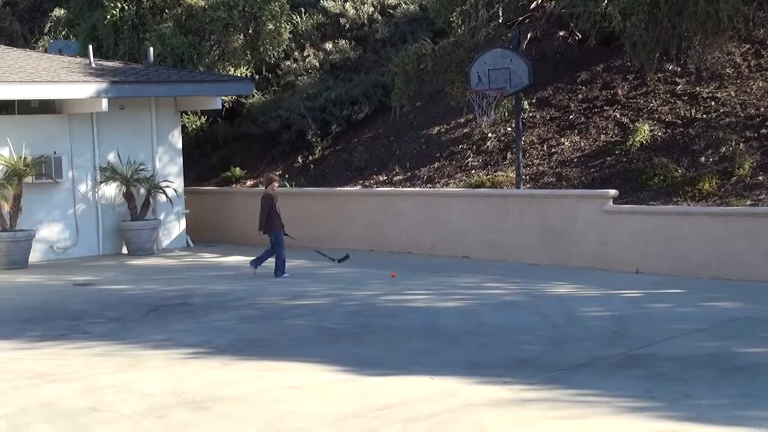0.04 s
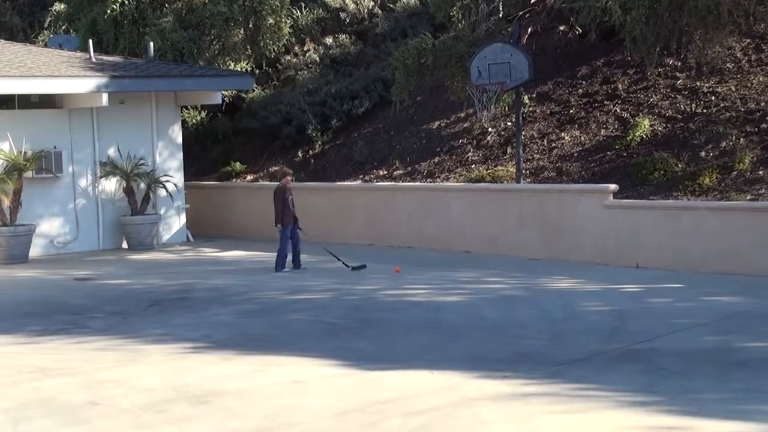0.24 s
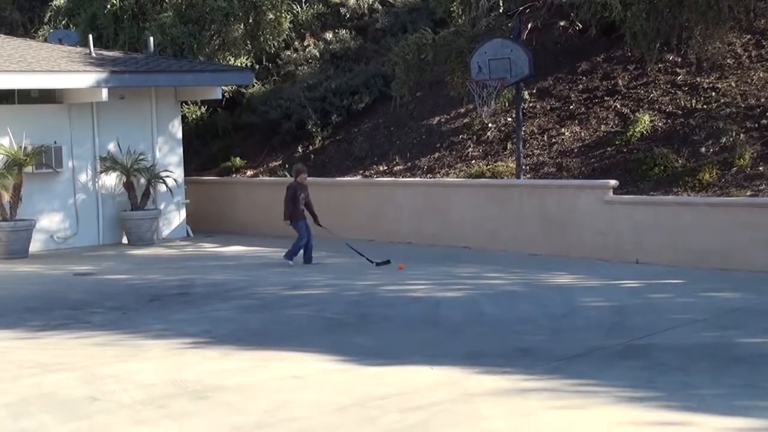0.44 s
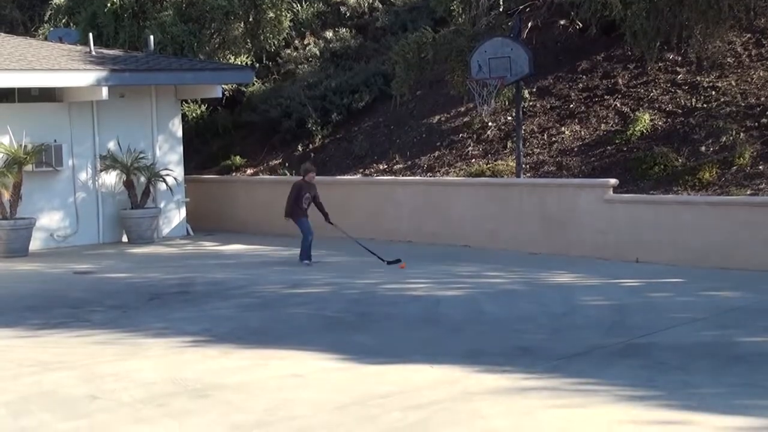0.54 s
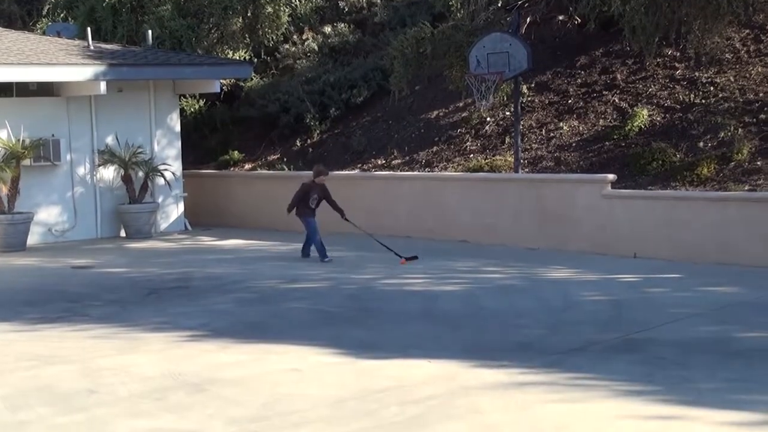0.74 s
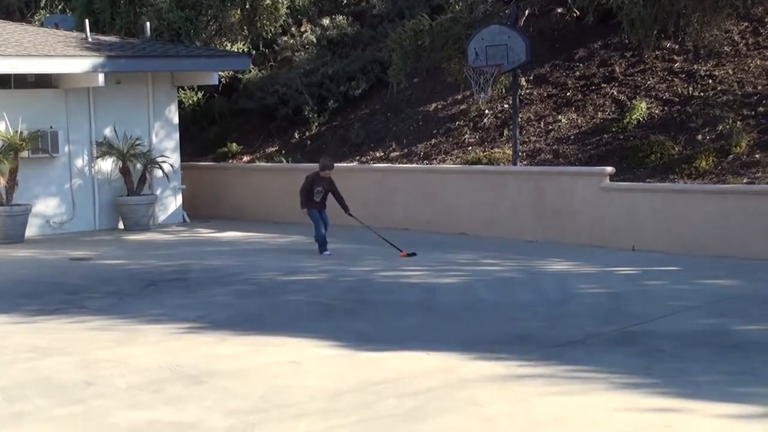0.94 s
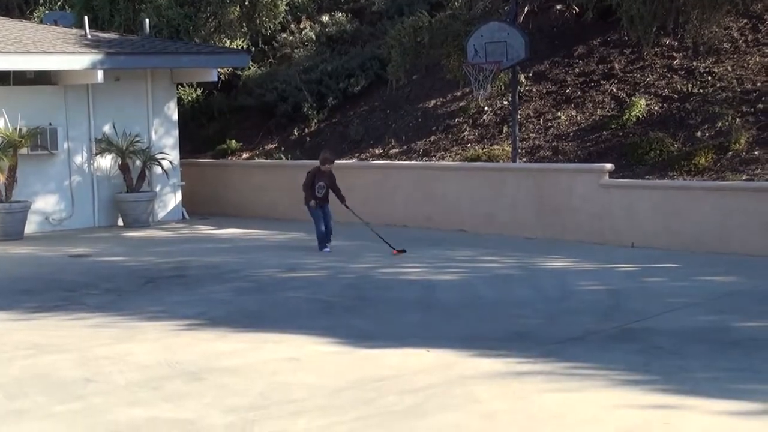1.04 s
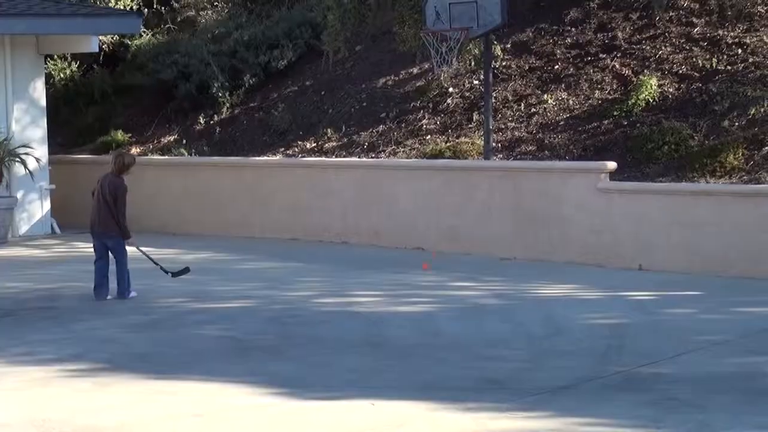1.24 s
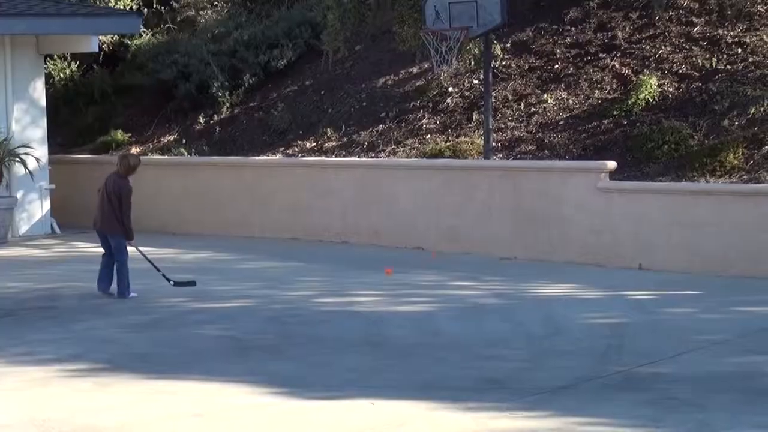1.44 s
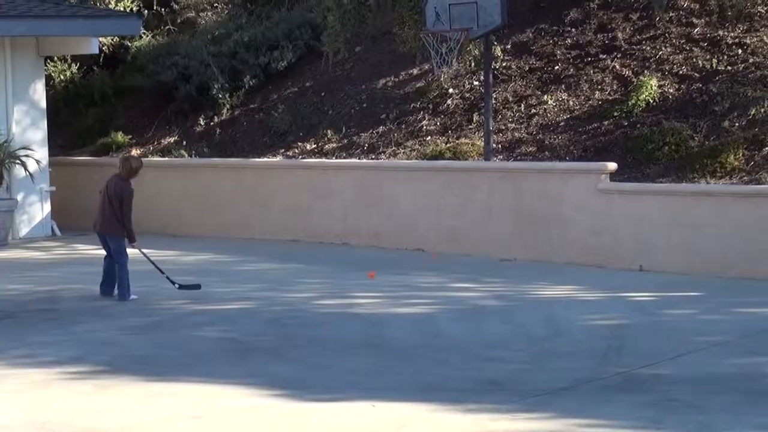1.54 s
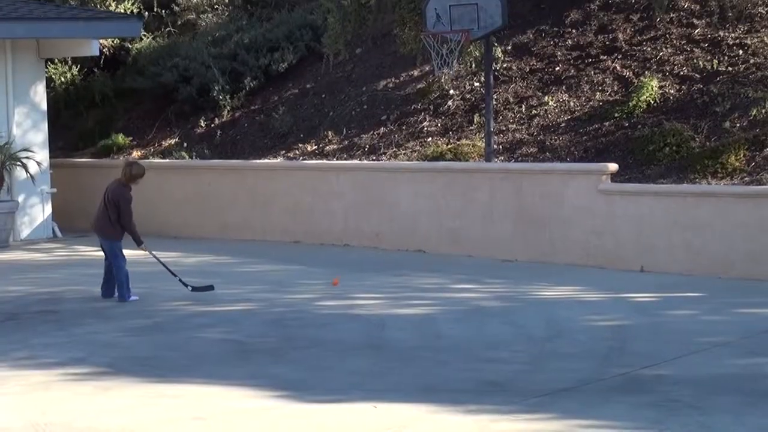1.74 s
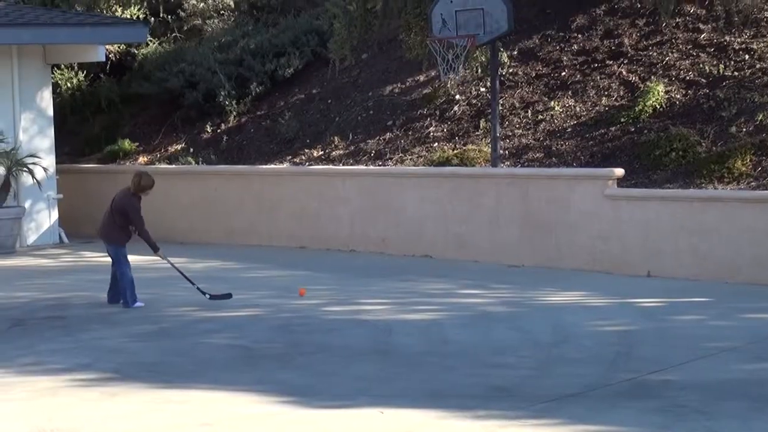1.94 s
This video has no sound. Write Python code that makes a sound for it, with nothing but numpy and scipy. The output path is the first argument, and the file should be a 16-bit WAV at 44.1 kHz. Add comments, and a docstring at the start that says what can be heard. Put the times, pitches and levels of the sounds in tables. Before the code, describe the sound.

A hockey stick cracks against a puck on concrete, then scrapes and taps.

```python
"""A sharp crack opens: a hockey stick slaps concrete and puck, the blade clatters and the shaft rings.
The blade then drags over grit, chatters in short stick-slip jerks and taps the ground between light
footfalls and swishes of sand. House and wall echo it all around the yard,
over a faint outdoor hum and the whistles of a distant bird."""
import sys
import numpy as np
from scipy import signal
from scipy.fft import rfft, irfft
from scipy.io import wavfile
from scipy.ndimage import uniform_filter1d

SR = 44100
rng = np.random.default_rng(int(sys.argv[2]) if len(sys.argv) > 2 else 0)


def wav_out(sig):
    """Save sig, one row per channel (or a flat mono array), as 16-bit PCM at SR to the path in sys.argv[1]."""
    wavfile.write(sys.argv[1], SR, np.round(np.clip(np.atleast_2d(sig).T, -1, 1) * 32767).astype(np.int16))


N = 88200

# blade hits: t/s, crack level/dB, clatter level/dB, clatter decay/s, ring level/dB
HITS = [(0.2235, -1.5, -20, 0.0041, -18), (0.2346, -8, -18.5, .0045, -15.5), (0.2368, -36, -20, 0.015, -3),
        (0.2517, -33, -23.5, 0.0095, -4.5), (0.2592, -17, -22.5, 0.0045, -15)]
# bright snap of a hit: f/Hz, level/dB
CRACK_EQ = [(150, -26), (500, -3), (1200, 2), (3000, -4), (5000, -3), (8000, -7.5), (12500, -9.5),
            (16000, -38)]
# hollow rattle of the blade: f/Hz, level/dB
CLATTER_EQ = [(170, -10.5), (225, -24), (335, 0.5), (480, -27.5), (670, -6.5), (780, 2), (950, 7),
              (1300, 1.5), (1550, -1.5), (2300, 4), (3600, -3.5), (6000, -16.5), (12000, -33.5),
              (16000, -35)]
# ringing modes of shaft and blade: f/Hz, level/dB, t60/s
STICK_MODES = [(322, -46, .2), (660.7, -28.5, 0.1), (676, -32, 0.18), (830, -47, .14), (966, -37.5, 0.49),
               (1140, -42, 0.08), (1252, -27.5, 0.046), (1410, -33.5, 0.14), (1781, -26, 0.044),
               (1789, -35.5, 0.3), (2255, -28.5, 0.073), (2396, -54, 0.12), (3045, -49, 0.12),
               (3190, -24.5, 0.22)]
SPLINTER_DB, SPLINTER_S = -22, 0.0041  # grit crushed under the blade, relative to the crack

# pressure curve of the dragging blade: t/s, level/dB
DRAG_CURVE = [(0.64, -70), (0.67, -64), (0.78, -68.5), (0.81, -56.5), (0.83, -53.5), (0.85, -51),
              (0.872, -54), (0.899, -61), (0.93, -69), (1.0, -78), (1.11, -53), (1.16, -64.5), (1.235, -70),
              (1.26, -93)]
# crackle under the drag: f/Hz, level/dB
GRIT_EQ = [(150, -12.5), (260, 17), (500, -13), (1300, -2.5), (2000, 4.5), (3400, 3), (5000, 0.5),
           (7000, -7.5), (11000, -10), (16000, -31)]
# stick-slip jerks: t/s, level/dB, decay/s, chirp f/Hz
SLIPS = [(0.854, -43.5, .002, 3340), (0.8624, -47, 0.0045, 3300), (0.9972, -38.5, 0.0036, 2300),
         (1.0061, -38.5, 0.0049, 2140), (1.016, -44, 0.0079, 1870), (1.0313, -38, 0.0058, 4550),
         (1.0395, -37.5, 0.004, 4000), (1.048, -38.5, 0.0082, 2970), (1.0663, -36.5, 0.0041, 4420),
         (1.075, -35, 0.0047, 4400), (1.084, -45, 0.0082, 4300)]
# bite of a jerk: f/Hz, level/dB
RASP_EQ = [(200, -22), (1300, -13.5), (1750, -9.5), (3000, -3.5), (4400, -2), (6500, -8.5), (11000, -13),
           (16000, -29)]
# resonances of the scraping blade: f/Hz, width/Hz, level/dB
BLADE_MODES = [(1768, 62, 10.5), (2113, 73, 8.5), (2670, 70, 5), (3360, 160, 3.5), (4315, 150, 1),
               (5970, 110, 0.5)]
GRIT_PER_S, RASP_PER_S, SAND_PER_S = 2400, 12000, 2400
CHIRP_DB, CHIRP_Q, SCRAPE_STOP_S = 2, 4.4, 1.248

# footfalls and light blade taps: t/s, click level/dB, thud level/dB
TOUCHES = [(0.5755, -41, -49), (0.585, -42, -50.5), (0.609, -45, -54.5), (0.656, -41, -60),
           (1.090, -18.5, -43.5), (1.1, -22, -42.5), (1.179, -36, -65), (1.388, -27.5, -63),
           (1.393, -29.5, -44.5), (1.423, -36, -58), (1.5858, -42, -54.5), (1.594, -48, -53.5),
           (1.625, -55, -60)]
# crisp top of a tap: f/Hz, level/dB
CLICK_EQ = [(200, 0), (1200, 2.5), (4000, -1.5), (7000, 3), (11000, 1), (16000, -15)]
# dull body of a tap: f/Hz, level/dB
THUD_EQ = [(50, -32), (250, -3.5), (600, 2.5), (1300, 1), (2500, -4), (6000, -12), (16000, -38)]
THUD_S, CRUNCH_DB, CRUNCH_S = 0.0059, -21.5, 0.0022
# sand swishing under shoe and puck: t/s, length/s, level/dB
SAND_SWISHES = [(0.383, 0.091, -60.5), (0.632, 0.18, -66.5), (0.787, 0.16, -63.5), (1.813, 0.15, -71)]
# hiss of the sand: f/Hz, level/dB
SAND_EQ = [(300, -12), (2000, -10), (5000, 1), (9000, -1.5), (12500, -9), (16000, -27)]
# soft shoe scuffs: t/s, length/s, level/dB
SHOE_SCUFFS = [(0.738, 0.11, -63.5), (1.09, 0.048, -55), (1.122, 0.079, -54.5)]
# muffled rub of a sole: f/Hz, level/dB
SCUFF_EQ = [(100, -10.5), (260, 1.5), (600, 1), (1200, -7.5), (2500, -19), (16000, -50)]

# bird notes: t/s, length/s, start f/Hz, end f/Hz, level/dB
BIRD_NOTES = [(1.476, 0.051, 3050, 3750, -69), (1.531, 0.051, 2230, 2860, -63.5),
              (1.767, 0.049, 3240, 3400, -71.5), (1.858, 0.056, 3830, 3480, -70.5)]
# reverb bands of the yard: f/Hz, t60/s, level/dB
YARD_BANDS = [(100, 0.59, -9.5), (401, 0.57, -1.5), (893, 0.54, -2), (1910, 0.47, -5.5), (4000, 0.45, -6.5),
              (8000, 0.38, -7), (14000, .3, -12.5)]
# slapback from house and wall: delay t/s, level/dB
SLAPBACKS = [(.0045, -14), (0.024, -11.5), (.036, -18), (0.098, -25)]
# stereo width of the reverb: f/Hz, side level/dB
REVERB_WIDTH = [(100, -30), (500, -18), (1000, -26.5), (2500, -35), (5000, -12), (8000, -3.5), (12000, -18)]
YARD_TRIM_DB, YARD_BUILD_S = -0.5, 0.004
TAIL_SMOOTH_HZ = 29.2  # width over which the reverb's stray peaks are evened out, for a smooth tail
STICK_WET_DB, SCRAPE_WET_DB, TAP_WET_DB = 0.5, -2.3, -1.2

# centre of the outdoor hum: f/Hz, level/dB
AIR_MID_EQ = [(20, -11), (40, -17), (65, -3.5), (130, 2), (190, -3.5), (260, 1.5), (450, -8.5),
              (900, -10.5), (1600, -19.5), (3500, -24.5), (7000, -30), (13000, -32.5), (16000, -30)]
# sides of the outdoor hum: f/Hz, level/dB
AIR_SIDE_EQ = [(20, 5), (70, -2.5), (250, -0.5), (1000, -27.5), (4000, -49), (8000, -25), (12000, -29.5),
               (16000, -55.5)]
AIR_MID_DB, AIR_SIDE_DB, AIR_PAN_DB = -59.5, -76, -1


def stick():
    """Each hit cracks, rattles the blade and rings the shaft; the slim stick radiates little bass."""
    t = since(0)
    crack = sum(undb(db) * (impulse(s) + undb(SPLINTER_DB) * burst(s, SPLINTER_S))
                for s, db, _, _, _ in HITS)
    clatter = sum(undb(db) * burst(s, decay) for s, _, db, decay, _ in HITS)
    pushes = sum(undb(db) * impulse(s) for s, _, _, _, db in HITS)
    ring = sum(undb(db) * np.exp(-np.log(1000) * t / t60) * np.sin(2 * np.pi * hz * t)
               for hz, db, t60 in STICK_MODES)
    sound = colour(crack, CRACK_EQ) + colour(clatter, CLATTER_EQ) + through(pushes, ring)
    return signal.sosfilt(signal.butter(4, 182, "high", fs=SR, output="sos"), sound)


def scrape():
    """The blade crackles over grit and slips in rasping, chirping jerks; both make it ring."""
    pressure = undb(np.interp(since(0), *np.array(DRAG_CURVE).T, left=-120, right=-120))
    friction = colour(grains(GRIT_PER_S) * pressure, GRIT_EQ)
    catches = (rng.random(N) < RASP_PER_S / SR) * rng.choice([-1, 1], N)
    rasp = colour(catches * np.sqrt(SR / RASP_PER_S), RASP_EQ)
    for start, db, decay, hz in SLIPS:
        slip = undb(db) * rasp * fade(start, decay, attack=0.00069)
        friction = friction + slip + undb(CHIRP_DB) * resonance(slip, hz, CHIRP_Q)
    return friction + sum(undb(db) * resonance(friction, hz, hz / width) for hz, width, db in BLADE_MODES)


def taps():
    """Shoe or blade meets concrete: a gritty click layered on a dull thud."""
    clicks = sum(undb(db) * (impulse(s) + undb(CRUNCH_DB) * burst(s, CRUNCH_S)) for s, db, _ in TOUCHES)
    thuds = sum(undb(db) * burst(s, THUD_S) for s, _, db in TOUCHES)
    return colour(clicks, CLICK_EQ) + colour(thuds, THUD_EQ)


def shuffle():
    """Sand grains slide in bright swishes; soles rub in dull scuffs."""
    sand = grains(SAND_PER_S) * sum(undb(db) * swell(s, length) for s, length, db in SAND_SWISHES)
    shoes = rng.standard_normal(N) * sum(undb(db) * swell(s, length) for s, length, db in SHOE_SCUFFS)
    return colour(sand, SAND_EQ) + colour(shoes, SCUFF_EQ)


def bird():
    """A distant bird whistles soft, gliding pure tones."""
    song = 0
    for start, length, start_hz, end_hz, db in BIRD_NOTES:
        hz = start_hz + (end_hz - start_hz) * np.minimum(since(start) / length, 1)
        song += undb(db) * swell(start, length) * np.sin(2 * np.pi * np.cumsum(hz) / SR)
    return song


def yard_tail():
    """The walls scatter sound into a diffuse tail; the treble dies first."""
    t, tail = since(0), 0
    noise = rfft(rng.standard_normal(2 * N))
    for (_, t60, db), share in zip(YARD_BANDS, np.eye(len(YARD_BANDS))):
        band = irfft(noise * contour(np.array(YARD_BANDS)[:, 0], share))[:N]
        envelope = (1 - np.exp(-t / YARD_BUILD_S)) * np.exp(-np.log(1000) * t / t60)
        tail += undb(db + YARD_TRIM_DB) * envelope / np.linalg.norm(envelope) * band
    return smooth_peaks(tail, TAIL_SMOOTH_HZ)


def air():
    """A bed of low outdoor hum, nearly the same in both ears."""
    mid = undb(AIR_MID_DB) * colour(rng.standard_normal(N), AIR_MID_EQ)
    side = undb(AIR_SIDE_DB) * colour(rng.standard_normal(N), AIR_SIDE_EQ)
    return np.array([(mid + side) * undb(AIR_PAN_DB / 2), (mid - side) * undb(-AIR_PAN_DB / 2)])


def undb(db):
    """Decibels to gain."""
    return 10 ** (np.asarray(db) / 20)


def since(start):
    """Seconds since a cue, zero before it."""
    return np.maximum(np.arange(N) / SR - start, 0)


def impulse(start):
    """A one-sample click."""
    return 1. * (np.arange(N) == int(start * SR))


def fade(start, decay, attack):
    """A percussive envelope: linear attack, exponential decay."""
    age = since(start)
    return np.minimum(age / attack, 1) * np.exp(-np.maximum(age - attack, 0) / decay)


def swell(start, length):
    """A rounded rise and fall."""
    return np.sin(np.pi * np.minimum(since(start) / length, 1))


def burst(start, decay):
    """A sudden puff of noise."""
    return rng.standard_normal(N) * fade(start, decay, attack=0.00021)


def grains(per_s, spread_db=0.5):
    """Sparse clicks of uneven size, at unit power."""
    clicks = (rng.random(N) < per_s / SR) * rng.standard_normal(N)
    clicks *= undb(spread_db * np.minimum(rng.exponential(size=N), 3))
    return clicks / clicks.std()


def contour(hz, values):
    """A curve drawn over log frequency, for every bin of a double-length transform."""
    return np.interp(np.log(np.arange(N + 1) * SR / (2 * N) + 1), np.log(hz), values)


def colour(x, eq):
    """Minimum-phase EQ at unit power: the curve sets only the tone, and attacks stay sharp."""
    gain = undb(contour(*np.array(eq).T))
    cepstrum = irfft(np.log(gain / np.sqrt(np.mean(gain ** 2))))
    cepstrum[1:N] *= 2
    cepstrum[N + 1:] = 0
    return irfft(rfft(x, 2 * N) * np.exp(rfft(cepstrum)))[:N]


def resonance(x, hz, q):
    """Band-pass with unit gain at its centre."""
    return signal.lfilter(*signal.iirpeak(hz, q, SR), x)


def through(x, response):
    """Convolve with an impulse response."""
    return signal.fftconvolve(x, response)[:N]


def smooth_peaks(tail, width_hz):
    """Tame the stray peaks of a reverb tail, keeping its broad colour."""
    spectrum = rfft(tail, 2 * N)
    broad, narrow = (uniform_filter1d(np.abs(spectrum) ** 2, int(hz * 2 * N / SR) + 1) + 1e-12
                     for hz in (10 * width_hz, width_hz))
    return irfft(spectrum * np.sqrt(broad / narrow))[:N]


def scene():
    """The action sits dead centre, in slapback and a narrow reverb, over the hum."""
    mid = yard_tail() + sum(undb(db) * impulse(s) for s, db in SLAPBACKS)
    side = irfft(rfft(yard_tail(), 2 * N) * undb(contour(*np.array(REVERB_WIDTH).T)))[:N]

    def in_yard(source, wet_db):
        return source + undb(wet_db) * np.array([through(source, mid + side), through(source, mid - side)])

    gate = np.exp(-since(SCRAPE_STOP_S) / 0.0013)  # the scrape and its echo stop short
    scraping = in_yard(scrape(), SCRAPE_WET_DB) * gate
    slap = in_yard(stick(), STICK_WET_DB)
    return slap + scraping + in_yard(taps() + shuffle() + bird(), TAP_WET_DB) + air()


def record(dry):
    """A steep high cut at 15.8 kHz on the whole mix."""
    return signal.sosfilt(signal.ellip(8, .2, 70, 15800, fs=SR, output="sos"), dry)


dry = scene()
out = record(dry)
wav_out(out)
```